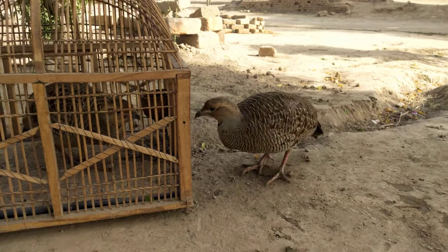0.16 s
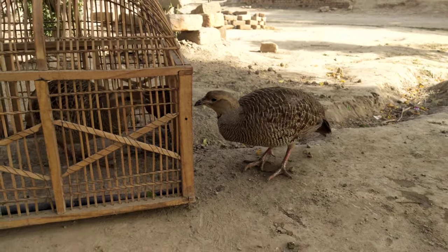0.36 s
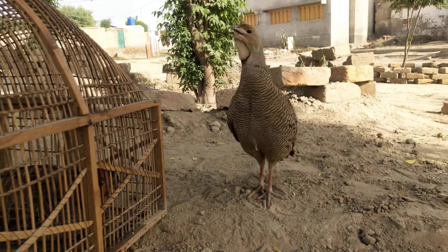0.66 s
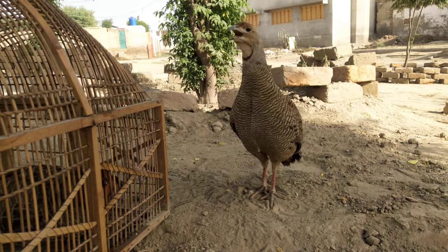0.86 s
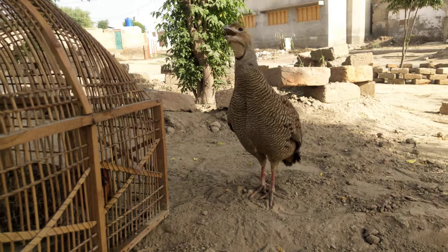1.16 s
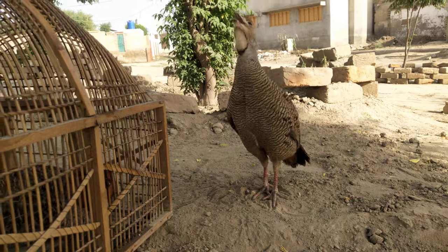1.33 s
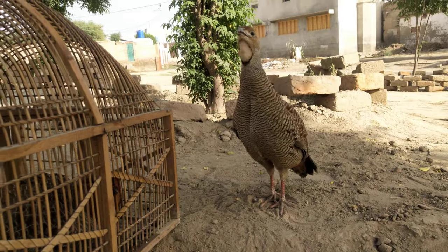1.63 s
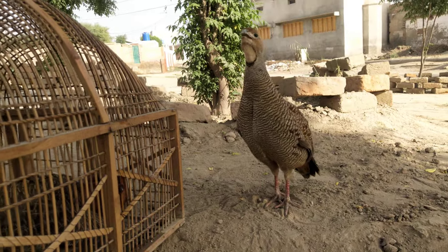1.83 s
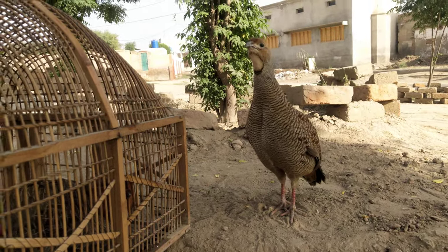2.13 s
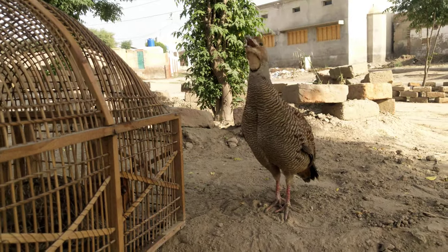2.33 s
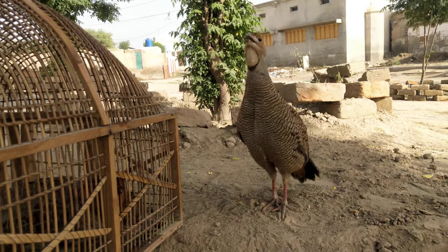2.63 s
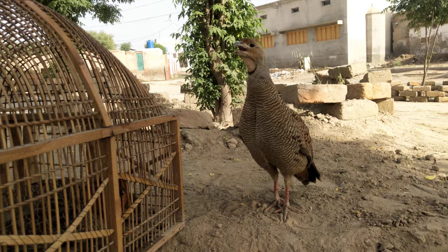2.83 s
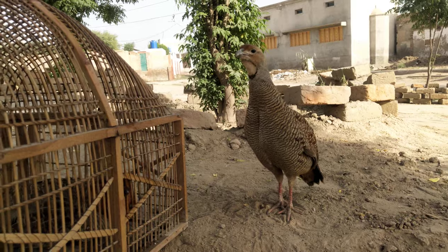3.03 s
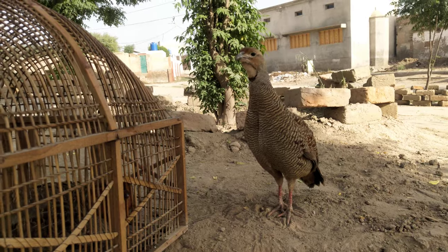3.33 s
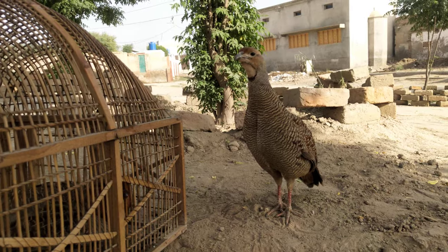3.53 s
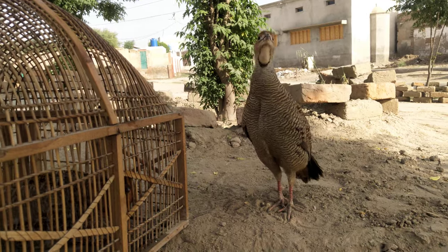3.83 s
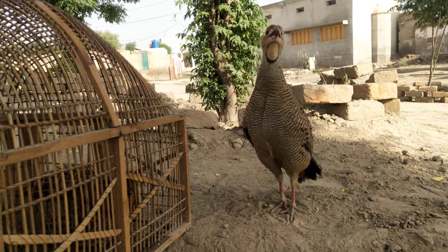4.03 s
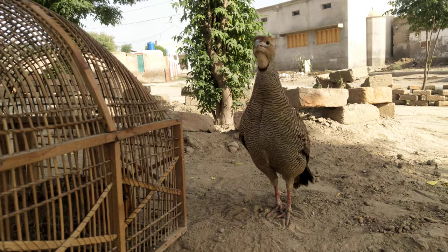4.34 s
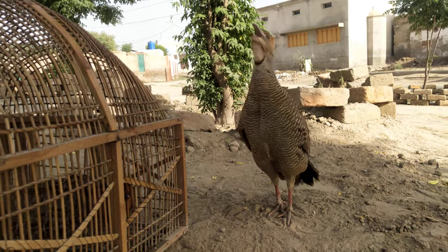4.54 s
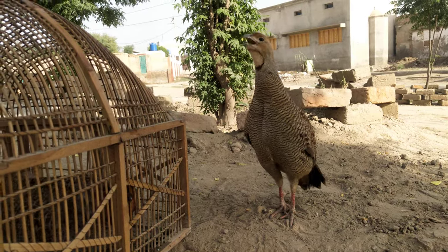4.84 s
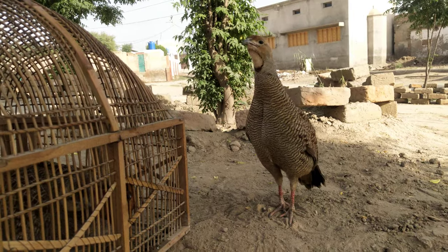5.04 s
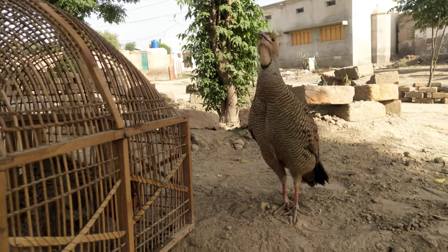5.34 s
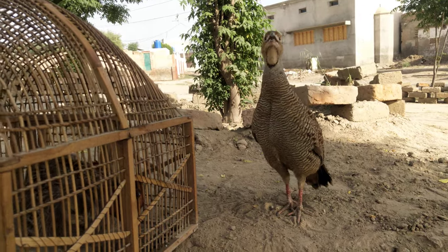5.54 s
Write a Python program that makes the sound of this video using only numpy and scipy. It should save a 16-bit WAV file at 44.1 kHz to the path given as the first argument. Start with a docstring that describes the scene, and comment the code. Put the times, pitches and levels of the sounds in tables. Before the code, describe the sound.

After a brief quiet moment with faint distant chirps, a francolin starts calling loudly a step from the microphone. Each of its six bouts opens with a harsh two-part cry and runs on in a few quick, rasping notes that fall in pitch. Thin high whistles and soft clucks fill the gaps. The open yard adds a slight echo from far walls.

```python
"""An open yard with far walls, where a caged francolin calls in bouts a step from the microphone.
A bout opens with a long two-part cry, runs on in short notes and mostly ends in soft clucks.
Each note starts as a harsh rattle of the syrinx, locks into a clear falling tone and dulls as it drops.
Thin whistles sound between bouts, chirps and hoots come from far off, two dry ticks pass,
and a distant drone fades early."""
import sys
import numpy as np
from scipy import signal
from scipy.fft import rfft, irfft, next_fast_len
from scipy.io import wavfile
from scipy.ndimage import uniform_filter1d, minimum_filter1d, map_coordinates

SR = 44100
rng = np.random.default_rng(int(sys.argv[2]) if len(sys.argv) > 2 else 0)


def digitize_waveform(pressure):
    """Quantize a signal to 16-bit integers and store it at the path in sys.argv[1].

    Rows of a 2-D input are taken as channels; values are limited to [-1, 1].
    """
    field = np.atleast_2d(pressure).T
    bounded = np.clip(field, -1, 1)
    quanta = np.round(bounded * 32767).astype(np.int16)
    wavfile.write(sys.argv[1], SR, quanta)


N = 250047


def amp(db):
    """Decibels to gain."""
    return 10 ** (np.asarray(db) / 20)


def unit(x):
    """Scale to rms 1."""
    return x / np.sqrt(np.mean(x ** 2) + 1e-20)


def along(points, hz):
    """Read a curve of (Hz, value) points on a log frequency axis."""
    freqs, values = np.transpose(points)
    return np.interp(np.log(hz + 1), np.log(freqs + 1), values)


def filtered(x, response):
    """EQ a track with a complex response, given as a function of Hz."""
    size = next_fast_len(N + SR // 2)
    return irfft(rfft(x, size) * response(np.fft.rfftfreq(size, 1 / SR)), size)[..., :N]


def causal(db):
    """The minimum-phase response with this gain: it rings only after its cause."""
    cepstrum = irfft(np.log(amp(db)))
    half = len(cepstrum) // 2
    cepstrum[1:half] *= 2
    cepstrum[half + 1:] = 0
    return np.exp(rfft(cepstrum))


def wobble(t, rate):
    """A smooth random curve over times t, rate knots a second."""
    return map_coordinates(rng.standard_normal(4096), [t * rate], mode="wrap")


def gate(t, length, rise, fall):
    """A smooth fade in and out; times in seconds."""
    fade_in = np.sin(np.pi / 2 * np.clip(t / rise, 0, 1)) ** 2
    fade_out = np.sin(np.pi / 2 * np.clip((length - t) / fall, 0, 1)) ** 2
    return fade_in * fade_out


def clock(length):
    """Sample times t of a sound, and its progress u from 0 to 1."""
    t = np.arange(max(int(length * SR), 16)) / SR
    return t, t / t[-1]


def phase_of(hz):
    """The running phase of a pitch curve, in radians."""
    return 2 * np.pi * np.cumsum(hz) / SR


def add(track, start, sound):
    """Mix a sound into a track at start seconds."""
    part = track[max(int(start * SR), 0):][:len(sound)]
    part += sound[:len(part)]


def soft_noise(samples):
    """Mono noise of rms 1 with the top rolled off."""
    return unit(signal.lfilter([1], [1, -.6], rng.standard_normal(samples)))


# Stereo width of the noise. Each row: frequency in Hz, left-right likeness (1 is mono).
NOISE_LIKENESS = [(60, 0.57), (300, 0.66), (1000, 1), (5000, 0.3)]


def stereo_noise(spectrum):
    """Coloured noise of rms 1, spread between mid and side."""
    def colour(hz):
        width = np.arccos(np.clip(along(NOISE_LIKENESS, hz), -1, 1)) / 2
        return amp(along(spectrum, hz)) * [np.cos(width), np.sin(width)]
    mid, side = filtered(rng.standard_normal((2, N)), colour)
    return unit(np.array([mid + side, mid - side]))


# Colours of the open air and the drone. Each row: frequency in Hz, relative level in dB.
AIR_EQ = [(25, -15.5), (45, -10), (65, 3), (100, -8), (160, -1.5), (310, -10), (480, -10.5), (650, -16),
          (1100, -22.5), (1600, -23.5), (3200, -23), (6000, -28), (8000, -34), (10000, -46.5),
          (15500, -55.5)]
DRONE_EQ = [(30, -40.5), (70, -11.5), (96, 13.5), (120, -3.5), (185, -7), (260, -17), (500, -21.5),
            (1000, -45), (7000, -47.5), (9000, -54)]
# The drone's fader. Each row: time in seconds, level in dB.
DRONE_FADE = [(0, -41), (.44, -43), (.5, -53.5), (.7, -66)]


def air_and_drone(air_db=-52):
    """A steady bed of open air, and a distant drone that sinks beneath it."""
    fade_db = np.interp(np.arange(N) / SR, *np.transpose(DRONE_FADE))
    drone = amp(fade_db) * stereo_noise(DRONE_EQ)
    return amp(air_db) * stereo_noise(AIR_EQ) + drone


# Far birds. Each row: start and end in seconds, first and last pitch in Hz, level in dB.
FAR_CHIRPS = [(0.099, .14, 4820, 4030, -64), (.185, .212, 3330, 2800, -60), (0.282, 0.314, 4500, 4820, -60),
              (.345, 0.38, 3040, 3400, -59), (0.361, 0.41, 3760, 2640, -54),
              (0.476, .492, 4500, 5300, -49.5), (3.263, 3.293, 5820, 5600, -61),
              (3.644, 3.69, 4800, 2970, -51)]


def chirps():
    """Small birds far off, each chirp a quick, wavering sine glide."""
    out = np.zeros(N)
    for start, end, first_hz, last_hz, db in FAR_CHIRPS:
        t, u = clock(end - start)
        hz = (first_hz + (last_hz - first_hz) * u) * (1 + .014 * wobble(t, 260))
        add(out, start, amp(db) * np.sin(np.pi * u) * np.sin(phase_of(hz)))
    return out


# Dry ticks. Each row: start in seconds, level in dB.
DRY_TICKS = [(0.373, -43), (0.483, -57)]


def ticks(t60=.009):
    """Small bursts of noise that die at once."""
    out = np.zeros(N)
    t, _ = clock(.08)
    for start, db in DRY_TICKS:
        add(out, start, amp(db - 60 * t / t60) * soft_noise(len(t)))
    return out


def rattle(level_db, tension=1, soft_db=-23, pulse_hz=325, ring_hz=1380, ring_s=.0011):
    """The unlocked syrinx claps in pulses; effort makes them faster, higher, brighter, more chaotic."""
    t, u = np.arange(len(level_db)) / SR, np.linspace(0, 1, len(level_db))
    effort = np.clip((level_db - soft_db) / 14, 0, 1)
    chaos = .016 + .134 * effort
    swoop = wobble(t, 132)  # the ring squeals up and down across several pulses
    rate = pulse_hz * (1 + .7 * effort + .15 * u) * np.exp(chaos * wobble(t, 400))
    pulse, turn = np.divmod(np.cumsum(rate) / SR, 1)
    age = turn / rate  # seconds since the last clap
    size, detune = rng.standard_normal((2, 128))[:, pulse.astype(int)]
    hz = ring_hz * tension * (1 + .67 * effort) * np.exp(chaos * (detune / 2 + swoop))
    phase = 2 * np.pi * hz * age
    brightness = amp(-19 * (1 - effort))
    overtones = amp(-6) * (np.sin(2 * phase) + 1.6 * np.sin(3 * phase))
    turbulence = 2 * amp(-8) * soft_noise(len(t))
    clap = np.exp(-age / ring_s) * amp(1.6 * size) * (1 - turn ** 8)
    chest = amp(-9 - 21 * effort) * np.sin(2 * np.pi * turn)  # soft pulses keep their low fundamental
    wave = unit(clap * (np.sin(phase) + brightness * (overtones + turbulence))) + chest
    return wave * amp(level_db) * gate(t, t[-1], .00033, .002)


def tone(hz, db, overtone_db, dull_db_per_octave=48, scoop_s=.005, jitter=.0091, air_db=-23):
    """The locked syrinx on a pitch curve: as tension drops the overtones go first, then the level."""
    t, k = np.arange(len(hz)) / SR, np.arange(2, 9)[:, None]
    top_hz = hz.max()
    scoop = .054 * (top_hz / 2000) ** 2 * np.exp(-t / scoop_s)  # slides up into pitch
    hz = hz * (1 - scoop + jitter * wobble(t, 900))
    slack = np.maximum(np.log2(top_hz / hz), 0)  # octaves under the top pitch
    dull_db = dull_db_per_octave * slack
    phase = phase_of(hz)
    flutter_db = 3 * wobble(t + k, 130)  # each overtone wavers on its own
    gains = amp(overtone_db - dull_db - 4 * (k - 2) ** .86 + flutter_db) * (k * hz < SR / 2)
    leak = amp(air_db - dull_db / 2) * (1 + np.cos(phase))  # air escapes once a cycle
    air = leak * rng.standard_normal(len(t))
    wave = np.sin(phase) + np.sum(gains * np.sin(k * phase), axis=0) + air
    shimmer_db = (.3 + 4 * slack) * wobble(t, 260)  # a slack syrinx beats unevenly
    return wave * amp(db - 20 * slack ** 2 + shimmer_db) * gate(t, t[-1], .0017, .0005)


def held_tone(length, top_hz, db, overtone_db, drop, bend):
    """A tone that keeps its pitch, then slips by the fraction drop just before it breaks up."""
    _, u = clock(length)
    return tone(top_hz * (1 - drop * u ** bend), db, overtone_db)


def falling_tone(hold_s, db, overtone_db, top_hz, end_hz, sag_hz_per_s, knee_s, release_db, closing_db):
    """A tone that holds, then sags at a steady rate and dulls as the beak closes."""
    t, u = clock(hold_s + (top_hz - end_hz) / sag_hz_per_s)
    hz = top_hz - sag_hz_per_s * knee_s * np.logaddexp(0, (t - hold_s) / knee_s)
    fallen = (top_hz - hz) / (top_hz - end_hz)
    return tone(hz, db - release_db * u ** 5, overtone_db - closing_db * np.sqrt(fallen))


# The cry that opens each bout. Each row: start in seconds; lock, break, relock and sag in seconds
# from that start; held pitch in Hz, base level in dB, squeal from 0 to 1, thump level in dB.
OPENING_CRIES = [(.527, .041, .075, 0.096, 0.11, 2007, -7.5, .1, -18),
                 (1.217, 0.037, .068, 0.084, 0.11, 2074, -7.5, 1, -34.5),
                 (2.368, .036, 0.077, 0.091, 0.11, 2050, -7.5, .9, -33),
                 (3.702, .037, .073, .092, 0.11, 2018, -7, 0.4, -45.5),
                 (4.477, .038, .065, .089, .110, 2656, -7.5, 0.81, -29.5),
                 (5.2, .041, .063, 0.089, .110, 2690, -8, 0.92, -29.5)]


def cries(squeal_hz=1750, squeal_at_s=.004, squeal_s=.016, attack_s=.006, overlap_s=.0018):
    """The syrinx squeals into a rasp, holds a tone, breaks up briefly and relocks into a falling tone."""
    out = np.zeros(N)
    for start, lock, broken, relock, sag, held_hz, db, squeal, _ in OPENING_CRIES:
        t, _ = clock(lock + overlap_s)
        duck = 1 - .92 * squeal * gate(t - squeal_at_s, squeal_s, .0036, .0048)  # room for the squeal
        tension = 1 + .55 * squeal * np.exp(-t / .018)  # the rasp starts shrill and settles
        add(out, start, duck * rattle(db - 1.5 - 10 * np.exp(-t / attack_s), tension))
        shriek = held_tone(squeal_s, squeal_hz, db - 2, overtone_db=5.5, drop=.34, bend=3)
        add(out, start + squeal_at_s, squeal * shriek)
        held_s = broken - lock + 2 * overlap_s
        held = held_tone(held_s, held_hz, db + 1.5, overtone_db=-.9, drop=.14, bend=9.5)
        add(out, start + lock - overlap_s, held)
        _, u = clock(relock - broken + 2 * overlap_s)
        rough_break = rattle(db - 8 + 9 * (2 * u - .9) ** 2)  # quietest near its middle
        add(out, start + broken - overlap_s, rough_break)
        fall = falling_tone(sag - relock + overlap_s, db + 3.3, overtone_db=-2, top_hz=2039, end_hz=1401,
                            sag_hz_per_s=13350, knee_s=.0044, release_db=12.5, closing_db=5.5)
        add(out, start + relock - overlap_s, fall)
    return out


def thumps(band_hz=(70, 170)):
    """A dull thump as each cry locks."""
    out = np.zeros(N)
    t, _ = clock(.08)
    thump = signal.sosfilt(signal.butter(2, band_hz, "band", fs=SR, output="sos"), t == 0)
    for start, lock, *_, db in OPENING_CRIES:
        add(out, start + lock, amp(db) * thump / np.abs(thump).max())
    return out


# Throat resonances and the treble the open beak lets out. Each row: frequency in Hz, gain in dB.
THROAT_EQ = [(60, -48.5), (200, -29.5), (330, -13.5), (650, -21), (950, -11.5), (1300, -8.5), (1410, -9),
             (1550, -4.5), (2000, 0.5), (2350, 2), (2650, 1.5), (2850, 1), (3500, 5.5), (3820, -3),
             (4080, -3.5), (4650, -5), (5300, 3), (6050, -2.5), (6400, 0.5)]
BEAK_EQ = [(6400, 0.5), (7900, -1), (8700, -9.5), (11000, -19.5), (15500, -11.5)]


def open_throat(syrinx):
    """The throat and open beak colour the sound of the syrinx."""
    return filtered(syrinx, lambda hz: causal(along(THROAT_EQ, hz) + along(BEAK_EQ, hz)))


# The bird's stereo image. Each row: frequency in Hz, left over right in dB.
BIRD_PAN = [(1000, 1.5), (1400, 3.5), (1760, -7), (1900, -5), (2000, -3.5), (2100, -1.5), (2650, 3.5),
            (3400, -4.5), (3750, 9), (4080, 4), (4950, -5), (5900, 7), (6700, 1.5), (9000, -1),
            (13000, 6.5)]
# Its phase spread. Each row: frequency in Hz, lead of the left side in radians.
BIRD_PHASE = [(600, 0.6), (1350, -0.84), (1700, -1.36), (1850, 0.5), (2050, 1.89), (2650, 1.4),
              (3100, 1.67), (3450, 2), (4050, -0.4), (5250, 1.26), (6000, -1.5), (7000, -4.7), (8100, -2),
              (10000, 1.5), (13000, -1.3)]


def direct_path(bird):
    """Between cage and ground, each frequency reaches the two sides at its own level and phase."""
    side = np.array([[.5], [-.5]])
    return filtered(bird, lambda hz: amp(side * along(BIRD_PAN, hz))
                    * np.exp(1j * side * along(BIRD_PHASE, hz)))


# The yard's reverb. Each row: frequency in Hz, seconds to decay by 60 dB.
YARD_DECAY = [(200, .6), (1700, 0.94), (3400, 1), (6000, 0.58), (9000, .25), (15000, 0.13)]
# Slaps off the far walls. Each row: delay in seconds, level in dB before the treble roll-off.
WALL_ECHOES = [(0.114, -43.5), (.15, -39), (.21, -44)]


def yard(bird, tail_db=-30, cage_db=-9, cage_t60=.028, cage_hz=5000, dull_hz=2600):
    """The cage bars scatter the treble at once; far walls echo and leave a thin, dull tail."""
    hz, t, bands = signal.stft(rng.standard_normal((2, SR)), SR, nperseg=256)
    decay = amp(-60 * t / along(YARD_DECAY, hz)[:, None])
    _, tail = signal.istft(bands * decay, SR, nperseg=256)
    walls = amp(tail_db) * tail / np.linalg.norm(tail[0])
    for delay, db in WALL_ECHOES:
        walls[:, int(delay * SR)] += amp(db)
    walls = signal.lfilter(*signal.butter(1, dull_hz, fs=SR), walls)
    cage = rng.standard_normal(tail.shape) * amp(-60 * np.arange(tail.shape[1]) / SR / cage_t60)
    cage *= amp(cage_db) / np.linalg.norm(cage[0])
    cage = signal.lfilter(*signal.butter(1, cage_hz, "high", fs=SR), cage)
    return signal.fftconvolve(bird[None], cage + walls, axes=1)[:, :N]


# The notes after each cry. Each row: start in seconds, lock and sag in seconds from that start,
# top pitch in Hz, base level in dB.
SHORT_NOTES = [(0.762, .024, 0.03, 1814, -6.5), (.878, .028, .027, 1796, -6), (.989, .034, .029, 1797, -8),
               (1.457, 0.026, 0.038, 1918, -6.5), (1.583, 0.028, .033, 1874, -7.5),
               (1.703, .034, .031, 1802, -6.5), (1.821, 0.036, 0.04, 1533, -12.5),
               (2.61, .021, 0.031, 1915, -7), (2.723, .034, .033, 1933, -7.5),
               (2.842, .035, .033, 1858, -8.5), (3.941, .024, 0.034, 1852, -7.5),
               (4.054, .033, .034, 1807, -7.5), (4.168, 0.035, 0.031, 1750, -8),
               (4.734, .029, 0.039, 1926, -7.5), (4.852, .021, 0.035, 1797, -7.5),
               (4.971, .036, 0.038, 1800, -8.5), (5.468, .028, 0.042, 1911, -7.5),
               (5.583, .026, 0.039, 1820, -7.5)]


def notes(attack_s=.017, swell_db=15, overlap_s=.002):
    """A rattle swells and locks into a falling tone; the longer it holds, the brighter it is."""
    out = np.zeros(N)
    for start, lock, sag, top_hz, db in SHORT_NOTES:
        t, _ = clock(lock + overlap_s)
        add(out, start, rattle(db - 4 - swell_db * np.maximum(1 - t / attack_s, 0) ** 1.1))
        overtone_db = min(-10 + 800 * (sag - lock), 1.5)
        fall = falling_tone(sag - lock + overlap_s, db + 2.5 - .29 * overtone_db, overtone_db, top_hz,
                            end_hz=1125, sag_hz_per_s=22300, knee_s=.003, release_db=10, closing_db=7)
        add(out, start + lock - overlap_s, fall)
    return out


# Whistles between bouts. Each row: start and end in seconds, top pitch in Hz, level in dB.
THIN_WHISTLES = [(1.015, 1.116, 3344, -20.5), (1.751, 1.864, 3374, -17.5), (2.201, 2.336, 3438, -11.5),
                 (2.932, 3.043, 3434, -16), (3.436, 3.605, 3420, -13.5), (4.299, 4.44, 3550, -14.5),
                 (5.02, 5.155, 3458, -17)]
# Air through the whistle. Each row: frequency in Hz, relative level in dB.
HISS_EQ = [(500, -13.5), (1700, -8), (2800, -4), (3500, 1.5), (4400, -1.5), (6500, -9), (7500, -16),
           (9200, -17.5), (11000, -25.5), (15000, -23)]


def whistles(arch=.062, hiss_db=-27):
    """A thin, nearly pure whistle that arches with the airflow, and the hiss of that air."""
    whistle, flow = np.zeros(N), np.zeros(N)
    for start, end, top_hz, db in THIN_WHISTLES:
        t, u = clock(end - start)
        off_crest = np.abs(2 * u - 1.08) ** 2.5
        hz = top_hz * (1 - arch * off_crest + .002 * wobble(t, 200))
        level = amp(db - 3 * off_crest + .7 * wobble(t, 60)) * gate(t, t[-1], .025, .025)
        add(whistle, start, np.sqrt(2) * level * np.sin(phase_of(hz)))
        t, _ = clock(end - start + .049)  # the air moves before and after the whistle speaks
        add(flow, start - .02, amp(db) * gate(t, t[-1], .043, .048))
    return whistle, amp(hiss_db) * flow * stereo_noise(HISS_EQ)


# Clucks that close a bout. Each row: start and end in seconds, pulse rate in Hz,
# base levels of the cluck and of its hoarse rattle in dB.
SOFT_CLUCKS = [(1.11, 1.143, 345, -22.5, -38), (1.819, 1.859, 342.6, -24, -34.5),
               (1.963, 2.031, 328.3, -25, -34.5), (2.962, 3.031, 357.8, -22.5, -13.5),
               (4.295, 4.36, 318, -22.5, -26), (5.093, 5.123, 313, -27, -36.5)]
# The throat with the beak nearly shut. Each row: frequency in Hz, relative gain in dB.
SHUT_BEAK_EQ = [(330, -13.5), (680, -21), (1000, -14.5), (1280, 0), (1680, -1), (2050, -13.5),
                (2600, -20.5), (3100, -27), (3900, -17), (4700, -33), (5500, -24.5), (8000, -51.5),
                (14000, -47.5)]


def clucks(rise=.2, jitter=.039, shimmer_db=5.5, swell_db=7, rasp_db=-11, makeup_db=12):
    """Regular syrinx pulses that quicken a little, heard through the nearly shut beak."""
    out, k = np.zeros(N), np.arange(1, 40)[:, None]
    for start, end, pulse_hz, db, _ in SOFT_CLUCKS:
        t, u = clock(end - start)
        hz = pulse_hz * (1 + rise * (np.sin(2 * u) - .7) + jitter * wobble(t, 390))
        pulses = unit(np.sum(np.cos(k * phase_of(hz)), axis=0))
        rasp = amp(rasp_db) * rng.standard_normal(len(t))
        level = amp(db + swell_db * (np.sin(np.pi * u) - 1) + shimmer_db * wobble(t, 240.4))
        add(out, start, (pulses + rasp) * level * gate(t, t[-1], .0043, .011))
    return filtered(out, lambda hz: causal(along(SHUT_BEAK_EQ, hz) + makeup_db))


def hoarseness(swell_db=22):
    """A pressed cluck breaks into a rattle in its middle."""
    out = np.zeros(N)
    for start, end, *_, db in SOFT_CLUCKS:
        _, u = clock(end - start)
        add(out, start, rattle(db - swell_db * np.abs(2 * u - 1)))
    return out


# Faint low hoots. Each row: start and end in seconds, pitch in Hz, level in dB.
FAR_HOOTS = [(3.04, 3.23, 469, -53.5), (3.62, 3.83, 476, -49), (4.371, 4.512, 403, -46)]


def hoots():
    """Soft, nearly pure tones that swell and fade in the distance."""
    out = np.zeros(N)
    for start, end, hz, db in FAR_HOOTS:
        t, u = clock(end - start)
        phase = phase_of(hz * (1 + .012 * wobble(t, 25)))
        add(out, start, amp(db) * np.sin(np.pi * u) * np.sin(phase))
    return out


def scene(whistle_send_db=-8):
    """The bird up close and through the yard's reverb, over small sounds and a bed of air."""
    voice = open_throat(cries() + notes() + hoarseness()) + clucks()
    whistle, hiss = whistles()
    close = direct_path(voice + whistle) + hiss + thumps()
    reverb = yard(voice + amp(whistle_send_db) * whistle)
    return close + reverb + chirps() + ticks() + hoots() + air_and_drone()


def record(dry, ceiling=1.0, top_hz=15700):
    """A fast limiter holds the loudest peaks, and a steep low-pass cuts the very top."""
    needed = np.minimum(1, ceiling / (np.abs(dry).max(axis=0) + 1e-9))
    gain = uniform_filter1d(minimum_filter1d(needed, size=129), size=129)
    return filtered(dry * gain, lambda hz: hz < top_hz)


dry = scene()
out = record(dry)
digitize_waveform(out)
```